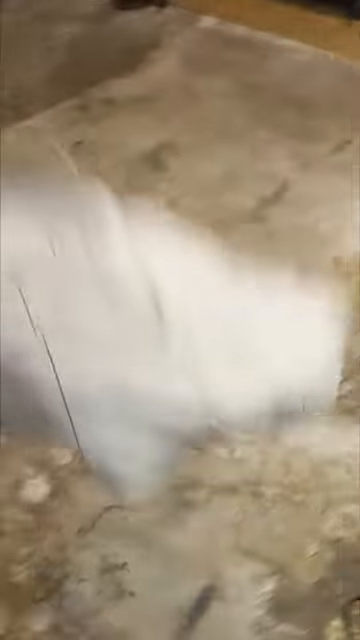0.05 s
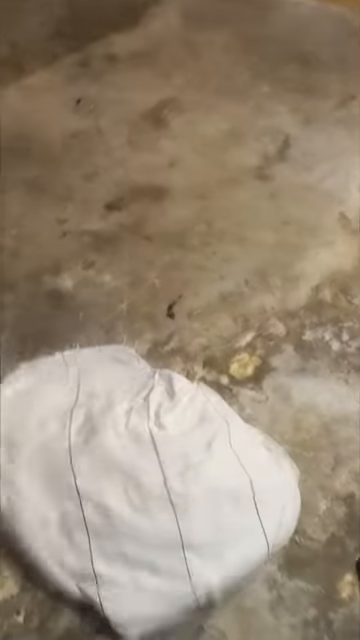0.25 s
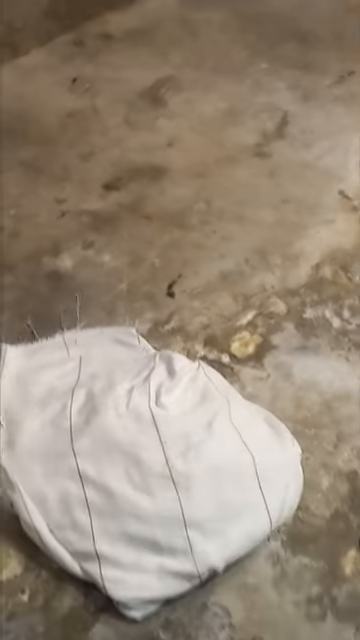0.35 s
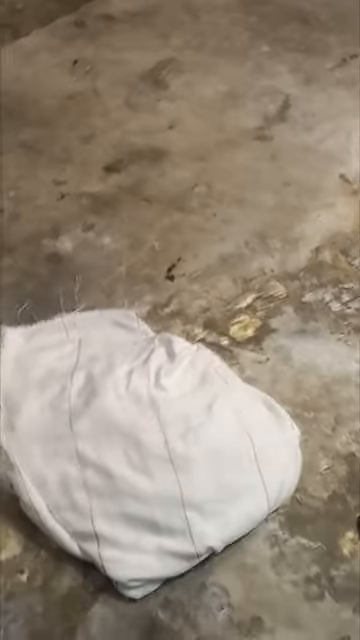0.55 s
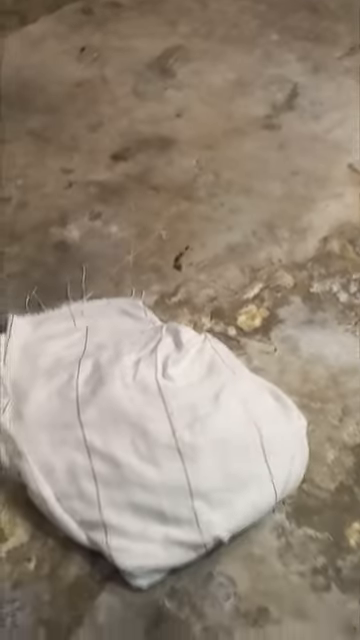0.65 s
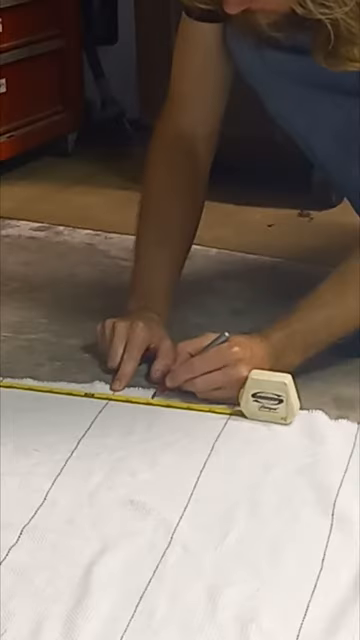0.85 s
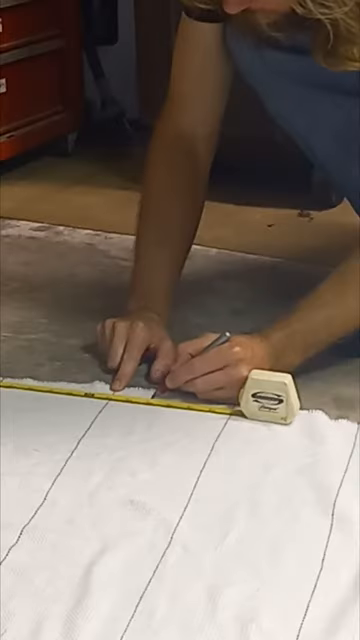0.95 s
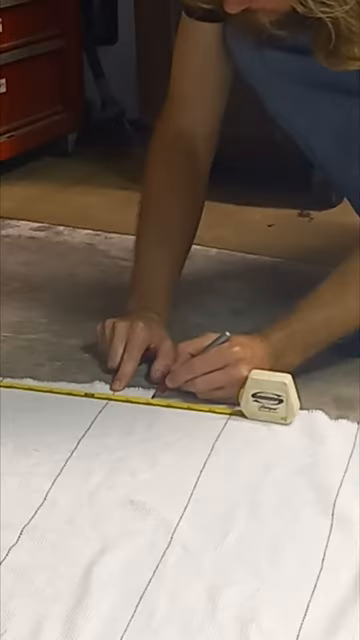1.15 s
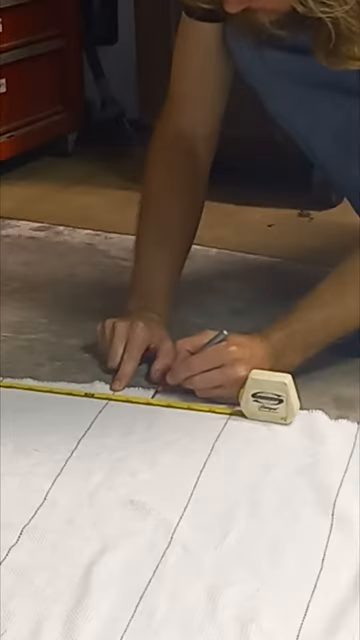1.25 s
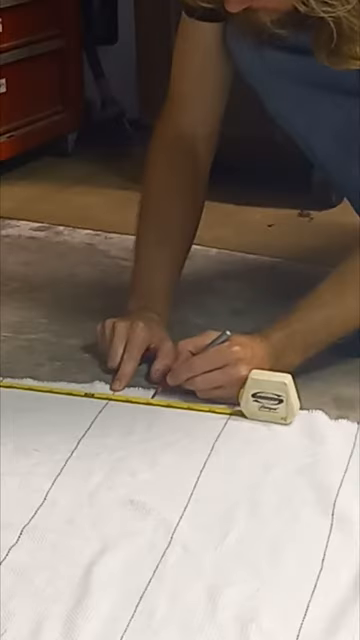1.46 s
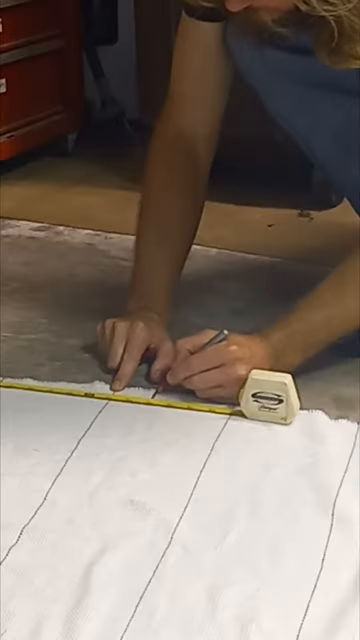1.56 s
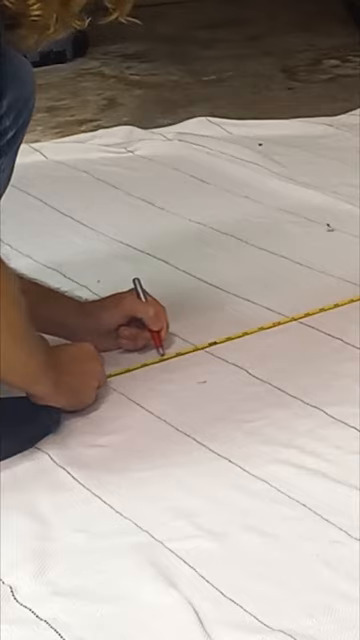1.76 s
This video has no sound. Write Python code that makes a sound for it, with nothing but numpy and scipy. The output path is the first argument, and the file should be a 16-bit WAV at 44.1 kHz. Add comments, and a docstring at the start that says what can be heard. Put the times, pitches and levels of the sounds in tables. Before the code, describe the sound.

A bundle of cloth lands on a concrete floor with a dull, slapping thud and a brief room ring. Faint pen strokes on fabric and soft bumps of hands and knees follow nearby, over low workshop hum and hiss.

```python
"""A workshop with a concrete floor, low machine hum and hiss. A bundle of cloth drops: the fabric
slaps, its folds land one after another with dull pushes of air, and the room rings briefly.
Then the scene cuts to work on the spread cloth: faint friction of pen strokes on the weave,
and soft bumps of hands and knees."""
import sys
import numpy as np
from scipy import signal
from scipy.fft import rfft, irfft
from scipy.io import wavfile
from scipy.ndimage import uniform_filter1d, minimum_filter1d

SR = 44100
rng = np.random.default_rng(int(sys.argv[2]) if len(sys.argv) > 2 else 0)


def bounce(signal):
    """Save signal as a 16-bit WAV file at the path given by the first command-line argument."""
    frames = np.transpose(np.atleast_2d(signal))
    limited = np.clip(frames, -1, 1)
    pcm = np.round(limited * 32767).astype(np.int16)
    wavfile.write(sys.argv[1], SR, pcm)


N = 79380
TIME_S = np.arange(N) / SR
BINS_HZ = np.arange(N // 2 + 1) * SR / N


def undb(db):
    """Decibels to gain."""
    return 10 ** (np.asarray(db) / 20)


def level(x, db):
    """Set the rms level."""
    return x * undb(db) / np.sqrt(np.mean(x ** 2))


def read(points, hz):
    """Interpolate a table over log frequency."""
    knots_hz, values = np.array(points, float).T
    return np.interp(np.log(np.maximum(hz, 1)), np.log(knots_hz), values)


def colour(x, spectrum):
    """Minimum-phase filter with the given response."""
    size = 2 * N
    cepstrum = irfft(np.log(undb(read(spectrum, np.arange(N + 1) * SR / size))))
    cepstrum[1:N] *= 2
    cepstrum[N + 1:] = 0
    return irfft(rfft(x, size) * np.exp(rfft(cepstrum)))[..., :N]


def pan(x, balance):
    """Tip each frequency left or right."""
    half_db = read(balance, BINS_HZ) / 2
    return irfft(rfft(x) * undb(np.array([half_db, -half_db])), N)


def wander(rate_hz):
    """Smooth random drift, unit rms."""
    return level(np.interp(TIME_S * rate_hz, np.arange(N), rng.standard_normal(N)), 0)


# stereo width (frequency [Hz], side over mid [dB])
WIDTH = [(40, 3), (110, -5.5), (200, -11), (380, -11), (750, -4), (1200, 1), (16000, 0)]
def diffuse(width_db=0):
    """White stereo noise: alike in the low mids, unrelated in the treble."""
    side_gain = undb(read(WIDTH, BINS_HZ) + width_db)
    mid, side = rfft(rng.standard_normal((2, N)))
    return irfft((mid + side_gain * side * np.array([[1], [-1]])) / np.hypot(1, side_gain), N)


# rumble and hiss before and after the cut (frequency [Hz], relative level [dB])
AIR_BEFORE = [(25, -24), (50, -17), (70, -7), (110, 1.5), (175, -10.5), (230, -5), (340, -3.5), (410, -10),
              (560, -13.5), (750, -20.5), (1400, -25.5), (2500, -30.5), (3400, -33.5), (4800, -36.5),
              (7000, -44.5), (8800, -51.5), (11500, -39.5), (15000, -38)]
AIR_AFTER = [(25, -43), (50, -12), (75, -13.5), (115, -2.5), (165, -11.5), (230, -3.5), (320, -4),
             (400, -8.5), (560, -7), (720, -18), (1100, -22), (1600, -26), (2800, -33), (4600, -32.5),
             (7000, -40.5), (9000, -46), (12000, -34.5), (15500, -35)]
# machine tones (frequency [Hz], level before the cut [dB], level after [dB])
HUM_TONES = [(116.5, -54, -47.5), (234.4, -47, -52.5), (441, -61.5, -61), (1922, -82, -72.5),
             (2023, -66, -78), (2140, -64, -84), (2330, -71, -79), (2694, -65.5, -79)]
# swell of the lowest tone after the cut (time [s], gain [dB])
HUM_SWELL = [(.73, 1), (.8, -8), (.88, -5), (1.02, -22), (1.12, 9.5), (1.26, 0), (1.46, 3.5), (1.58, -11.5),
             (1.66, 9), (1.7, 5.5), (1.8, 14)]
# background balance (frequency [Hz], left over right [dB])
AIR_PAN = [(60, -3.2), (300, -0.17), (4000, -0.2), (8500, 1), (13000, -3.1)]
def workshop(cut_s=0.729, sink_s=0.28, sink_db=-8.5, dip_s=1.664, dip_db=-13):
    """Machine hum and hiss: sink under the thud, change colour at the cut, later dip briefly."""
    before = level(colour(diffuse(), AIR_BEFORE), -35.5)
    after = level(colour(diffuse(), AIR_AFTER), -40)
    swell = undb(np.interp(TIME_S, *np.array(HUM_SWELL).T))
    for k, (hz, before_db, after_db) in enumerate(HUM_TONES):
        phase = 2 * np.pi * hz * TIME_S + 0.66 * wander(9.37)
        tone = np.sqrt(2) * np.sin(phase) * undb(1.16 * wander(8.2))
        before += undb(before_db) * tone
        after += undb(after_db) * tone * (swell if k == 0 else 1)
    sink = undb(sink_db * np.clip((TIME_S - sink_s) / 0.029, 0, 1))
    cut = np.clip((TIME_S - cut_s) / 0.0022, 0, 1)
    dip = undb(dip_db * np.exp(-((TIME_S - dip_s) / 0.0023) ** 2))
    return pan(before * sink * (1 - cut) + after * cut, AIR_PAN) * dip


def envelope(start_s, attack_s, hold_s, fade_s, step=0):
    """Initial step, linear rise, hold, exponential fade."""
    age_s = TIME_S - start_s
    rise = step + (1 - step) * np.clip(age_s / attack_s, 0, 1)
    return (age_s > 0) * rise * np.exp(-np.maximum(age_s - attack_s - hold_s, 0) / fade_s)


def rub(events, spectrum, attack_s, fade_s, grain_db, grain_hz):
    """Short strokes of friction noise, roughened by the weave."""
    pressure = sum(undb(db) * envelope(start_s, attack_s, hold_s, fade_s)
                   for start_s, hold_s, db in events)
    grains = diffuse() * undb(grain_db * wander(grain_hz))
    return pressure * level(colour(grains, spectrum), 0)


# fabric flicks and pen strokes (time [s], hold [s], level [dB])
FLICKS = [(.08, .008, -62)]
PEN_STROKES = [(.868, 0.029, -53), (1.052, 0.027, -55), (1.227, 0.03, -53), (1.535, 0.039, -53)]
# friction spectrum (frequency [Hz], relative level [dB])
SCUFF_SPECTRUM = [(500, -13.5), (2000, -9.5), (4500, -0.5), (7000, -4), (9500, -5), (12000, 2), (16000, -3)]
# scuff balance (frequency [Hz], left over right [dB])
SCUFF_PAN = [(1000, 2), (5000, 1.5), (8500, 7.5), (13000, 1)]
def cloth_scuffs():
    """Bright friction: the fabric flicks in flight; later a pen drags over it."""
    flick = rub(FLICKS, SCUFF_SPECTRUM, attack_s=0.006, fade_s=0.008, grain_db=-1, grain_hz=400)
    pen = rub(PEN_STROKES, SCUFF_SPECTRUM, attack_s=0.004, fade_s=0.046, grain_db=1, grain_hz=440)
    return pan(flick + pen, SCUFF_PAN)


# hand and knee shifts (time [s], hold [s], level [dB])
SHIFTS = [(.757, 0.033, -39), (.93, 0.025, -41.5), (1.06, 0.11, -39), (1.205, .05, -37),
          (1.335, .06, -40.5), (1.425, 0.037, -45), (1.53, 0.12, -41), (1.672, 0.017, -36.5),
          (1.71, 0.1, -36)]
# bump spectrum (frequency [Hz], relative level [dB])
BUMP_SPECTRUM = [(30, -21), (70, 1), (110, 1), (170, -9.5), (290, 3), (400, -6.5), (550, -7), (900, -25),
                 (1800, -29), (3000, -34.5), (6000, -60)]
def hands_and_knees():
    """Dull bumps as hands and knees shift on the floor."""
    return rub(SHIFTS, BUMP_SPECTRUM, attack_s=0.0042, fade_s=0.0082, grain_db=4, grain_hz=100)


# room decay (frequency [Hz], T60 [s])
ROOM_T60 = [(60, 0.47), (120, 0.28), (240, 0.4), (480, 0.32), (960, 0.46), (1900, 0.57), (3800, 0.57),
            (7700, 0.56), (15000, 0.57)]
def room(x, width_db=0, build_s=0.0045):
    """Dense reflections build up, then decay at a separate rate per octave."""
    octaves_hz = 60 * 2. ** np.arange(9)
    noise = rfft(diffuse(width_db))
    tail = 0
    for hz, weights in zip(octaves_hz, np.eye(len(octaves_hz))):
        band = irfft(noise * read(list(zip(octaves_hz, weights)), BINS_HZ), N)
        tail += band * undb(-60 * TIME_S / read(ROOM_T60, hz))
    tail *= 1 - np.exp(-TIME_S / build_s)
    return signal.fftconvolve(x[None], tail, axes=1)[:, :N]


# flaps landing (time [s], attack [s], hold [s], relative level [dB], low-pass [Hz])
FLAPS = [(0.2081, .016, 0.01, -2, 18000), (0.2464, 0.0037, 0.0068, -3, 1400),
         (0.287, 0.009, 0.0087, -7.5, 1510)]
# direct and reflected slap spectra (frequency [Hz], relative level [dB])
SLAP_DIRECT = [(100, -29), (300, 1.5), (520, 0), (820, -1), (1050, -12), (2400, -13), (4500, -21.5),
               (7000, -32.5), (9500, -39.5), (12000, -32), (16000, -43)]
SLAP_REFLECTED = [(100, -10.5), (350, 7.5), (560, 1), (830, -6), (1020, -10), (1500, -11), (2300, -14.5),
                  (3200, -20.5), (4500, -20.5), (7000, -35), (10000, -43), (16000, -38)]
def fabric_slap():
    """Countless creases hit the concrete, later flaps duller; the walls return them."""
    grains = diffuse(width_db=-2.5) * undb(3.5 * wander(900))
    creases = 0
    for start_s, attack_s, hold_s, db, cutoff_hz in FLAPS:
        flap = grains * undb(db) * envelope(start_s, attack_s, hold_s, fade_s=0.014, step=0.37)
        creases += signal.sosfilt(signal.butter(2, cutoff_hz, fs=SR, output="sos"), flap)
    direct = level(colour(creases, SLAP_DIRECT), -34.5)
    reflected = level(colour(room(creases[0]), SLAP_REFLECTED), -34)
    return direct + reflected


# folds landing (time [s], relative level [dB], rise to peak [ms])
FOLDS = [(0.2113, -12.5, 0.67), (.2168, -12.5, 0.62), (0.2265, -6, .8), (0.246, 0, 0.82),
         (0.2526, -7, 0.66), (0.2578, -14, .55), (0.2693, -6, 1.15), (0.2988, -13.5, 0.65),
         (0.3208, -10.5, 0.77)]
# room modes (frequency [Hz], relative level [dB], T60 [s])
ROOM_MODES = [(123, 0.5, 0.12), (186.7, -3.5, 0.12), (255.1, -1, 0.26), (298.4, -7, 0.52), (360, 2.5, 0.24),
              (498, -4, 0.28), (604, -7, .36), (646, 3, 0.22), (700, 3, 0.25), (743.6, 13, 0.4),
              (860, -9, .28), (1120, -5, .45), (1180, 0, 0.41), (1905, -4, .45)]
# room response to a push (frequency [Hz], relative gain [dB])
BOOM_SPECTRUM = [(30, -24), (60, -6.5), (110, 2.5), (170, -3.5), (260, 0), (380, 3.5), (550, 4), (800, 7),
                 (1100, -13), (3000, 14)]
def fold_thud(bass_cut_hz=77):
    """Each fold gives one soft pressure swing; the room booms and its modes ring on."""
    push = 0
    for time_s, db, rise_ms in FOLDS:
        swing = (TIME_S - time_s) / (rise_ms / 1000)
        push += undb(db) * swing * np.exp((1 - swing ** 2) / 2)
    modes = 0
    for hz, db, t60_s in ROOM_MODES:
        phase = 2 * np.pi * hz * TIME_S + rng.uniform(0, 2 * np.pi)
        modes += np.sin(phase) * undb(db - 60 * TIME_S / t60_s)
    ring = signal.fftconvolve(push, modes)[:N]
    boom = colour(room(push, width_db=-6), BOOM_SPECTRUM)
    thud = undb(-1.5) * push + level(ring, -32.5) + level(boom, -30.5)
    return signal.sosfilt(signal.butter(4, bass_cut_hz, "high", fs=SR, output="sos"), thud)


# balance of the landing bundle (frequency [Hz], left over right [dB])
BUNDLE_PAN = [(100, -2), (500, 0.5), (1200, -1.5), (4500, -4), (6500, 2.5), (8500, 9), (13000, 1)]
def scene():
    """The drop, then work on the cloth, over the workshop background."""
    bundle = pan(fold_thud() + fabric_slap(), BUNDLE_PAN)
    return bundle + cloth_scuffs() + hands_and_knees() + workshop()


def record(dry, ceiling=0.96, top_hz=15800):
    """Peak limiter with a 5 ms window, then a steep low-pass."""
    needed_gain = np.minimum(1, ceiling / (np.abs(dry).max(axis=0) + 1e-9))
    gain = uniform_filter1d(minimum_filter1d(needed_gain, size=221), size=221)
    return signal.sosfilt(signal.ellip(10, 0.2, 80, top_hz, fs=SR, output="sos"), dry * gain)


dry = scene()
out = record(dry)
bounce(out)
```